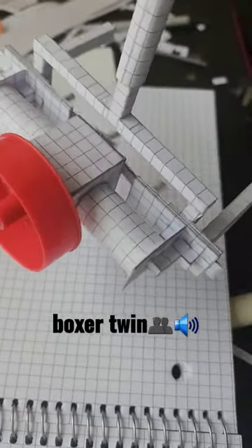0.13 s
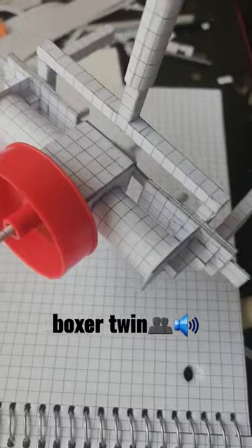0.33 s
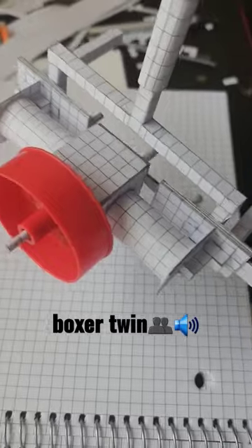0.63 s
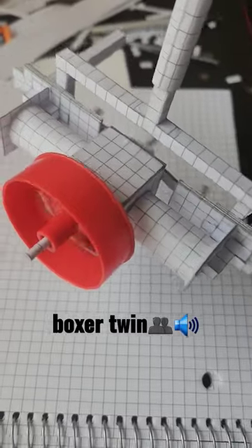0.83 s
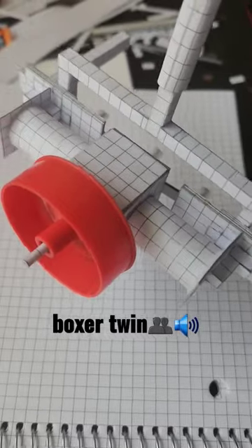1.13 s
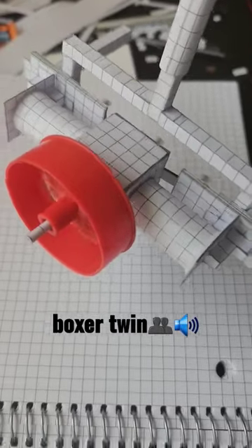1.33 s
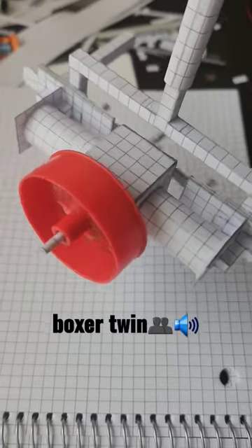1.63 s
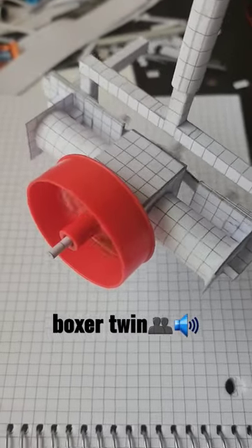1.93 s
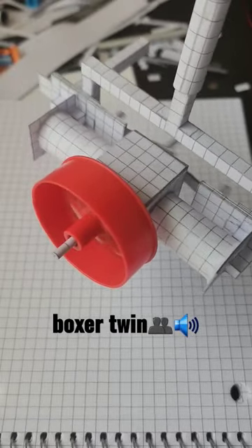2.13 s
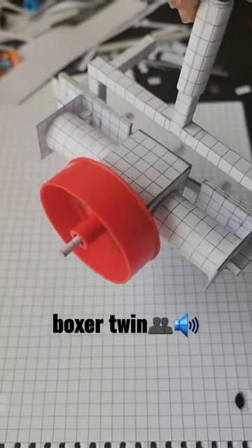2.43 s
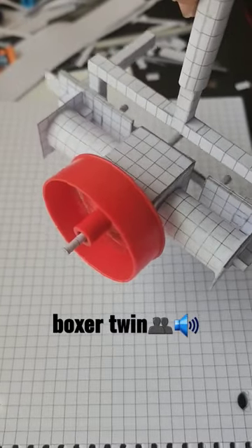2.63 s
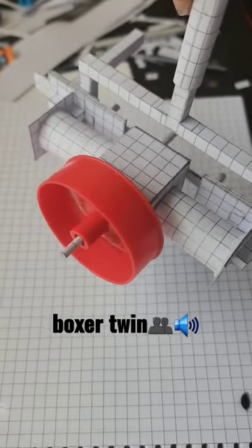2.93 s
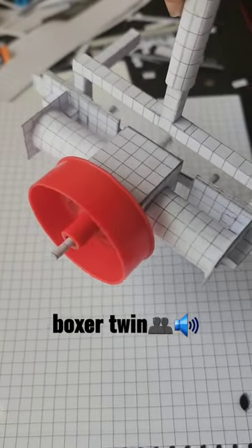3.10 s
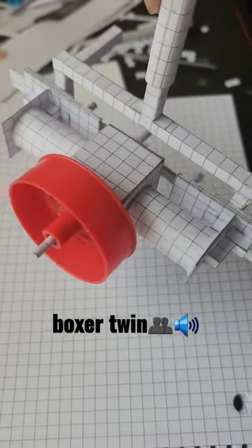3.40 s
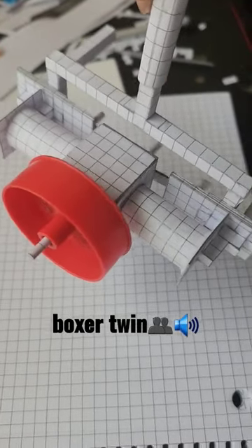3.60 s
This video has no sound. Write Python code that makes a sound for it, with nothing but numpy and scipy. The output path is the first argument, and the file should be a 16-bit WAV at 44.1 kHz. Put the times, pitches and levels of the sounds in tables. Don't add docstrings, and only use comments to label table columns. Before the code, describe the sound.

A small paper air engine putters quickly, low puffs and hollow knocks with dry papery clacks over pulsing air hiss; it slows slightly, surges faster and louder just after one second, then eases. Close stereo microphone, quiet room.

```python
import sys
import numpy as np
from scipy import signal
from scipy.io import wavfile
from scipy.ndimage import uniform_filter1d

SR = 44100
rng = np.random.default_rng(int(sys.argv[2]) if len(sys.argv) > 2 else 0)


def transcribe(u):
    v = np.clip(np.atleast_2d(u).T, -1, 1)
    q = np.round(v * 32767).astype(np.int16)
    wavfile.write(sys.argv[1], SR, q)


def natural_amplitude(level_db):
    exponent = np.asarray(level_db, float) / 20
    return 10 ** exponent


N = 165816
TIME_S = np.arange(N) / SR
PORT_LAG_S, CLICK_LIKENESS = 0.00019, 0.55


def read(points, hz):
    f, value = np.transpose(points)
    return np.interp(np.log(hz + 1), np.log(f + 1), value)


# time_s, pressure_db
AIR_SUPPLY = [(0, -8), (.08, -6.5), (.2, -9.5), (.45, -11), (.9, -14.5), (1.08, -14.5), (1.2, -5),
              (1.35, -2), (1.5, -0.5), (1.8, -3), (2.1, -7), (2.7, -9.5), (3.2, -10.1), (3.76, -9.5)]


def air_db(t_s):
    return np.interp(t_s, *np.transpose(AIR_SUPPLY))


# time_s, strokes_per_s
ENGINE_SPEED = [(0.0, 20.98), (0.091, 25.75), (0.184, 28.13), (0.322, 28.33), (0.57, 25.84), (0.93, 22.61),
                (1.107, 21.45), (1.151, 22.71), (1.222, 24.55), (1.286, 30.27), (1.472, 30.5),
                (1.777, 32.12), (2.039, 32.29), (2.339, 29.29), (2.663, 27.72), (3.238, 25.33),
                (3.76, 24.54)]
FIRST_STROKE = -0.423


def strokes():
    rate = np.interp(TIME_S, *np.transpose(ENGINE_SPEED))
    turns = FIRST_STROKE + np.cumsum(rate) / SR
    return turns, np.interp(np.arange(int(turns[-1]) + 1), turns, TIME_S)


def train(times_s, sizes):
    at = np.round(times_s * SR).astype(int)
    ok = (at >= 0) & (at < N)
    return np.bincount(at[ok], sizes[ok], N)


def ring(hz, decay_ms, order=0):
    u = np.arange(3000) / SR
    v = u * 1000 / decay_ms
    return v ** order * np.exp(-v) * np.sin(2 * np.pi * hz * u)


def t60_ring(hz, t60_s):
    return ring(hz, t60_s * 1000 / np.log(1000))


def walls(x):
    t60_s, size = 0.067, 12000
    taps = rng.choice([-1., 1.], (2, size)) * (rng.random((2, size)) < 0.05)
    taps *= natural_amplitude(-60 * np.arange(size) / SR / t60_s) * (np.arange(size) > 150)
    return signal.oaconvolve(x, taps / np.linalg.norm(taps[0]), axes=1)[:, :N]


# freq_hz, likeness_0_1
PORT_LIKENESS = [(60, .98), (300, .92), (700, .65), (1500, .6), (3000, .3), (15000, .25)]
# freq_hz, balance_db
PORT_BALANCE = [(60, 2), (130, 5.5), (290, 4.5), (640, 2.5), (1410, 6), (3100, 3.5), (6820, 4.5),
                (15000, 3.5)]


def noise(spectrum, patch_db):
    size = 2048 if spectrum[0][0] < 100 else 256
    hz = np.fft.rfftfreq(size, 1 / SR)
    frames = N // (size // 4) + 5
    a, b, c, d, patch = rng.standard_normal((frames, len(hz), 5)).T
    patch = uniform_filter1d(uniform_filter1d(patch, size=4, axis=0), size=5, axis=1)
    same = np.clip(read(PORT_LIKENESS, hz), 0, 1)[:, None]
    tilt = natural_amplitude(read(PORT_BALANCE, hz) / 2)[:, None]
    late = np.exp(-2j * np.pi * hz * PORT_LAG_S)[:, None]
    shared, own = a + 1j * b, c + 1j * d
    second = same * late * shared + np.sqrt(1 - same ** 2) * own
    z = np.array([shared * tilt, second / tilt])
    inside = (hz >= spectrum[0][0]) & (hz <= spectrum[-1][0])
    z *= (natural_amplitude(read(spectrum, hz)) * inside)[:, None] * natural_amplitude(patch_db * patch / patch.std())
    out = signal.istft(z, nperseg=size, noverlap=size * 3 // 4)[1][:, :N]
    return out / out.std()


# freq_hz, density_db
ROOM_AIR = [(40, -10), (70, -10), (120, 1), (200, -3), (310, -9), (440, -14), (800, -9), (1500, -21)]
# freq_hz, density_db
BOX_AIR = [(90, -35), (240, -32), (300, -3.5), (345, 1.5), (400, 2), (450, -37)]


def room_air():
    turns, air = strokes()[0], air_db(TIME_S)
    room = noise(ROOM_AIR, 1.6) * natural_amplitude(-44 + 0.27 * air)
    swell_db = 6.9 * np.sin(np.pi * (turns - 0.1))
    return room + noise(BOX_AIR, 2.3) * natural_amplitude(-42 + 1.1 * air + swell_db)


# choke_db, choke_lead_ms, choke_width_ms, burst_db, burst_decay_ms, swell_db
VALVE_GATE = [
    (-7.5, 1.05, 5, 2.5, 4.5, 7.5),
    (-2, 1, 7.5, 4, 4.5, 9.5),
]


def valve_gate_db():
    turns, times = strokes()
    k = np.clip(np.floor(turns).astype(int), -1, len(times) - 1)
    edges = np.r_[times, times[-1] + 0.04, times[0] - 0.048]
    since_ms, until_ms = (TIME_S - edges[k]) * 1000, (edges[k + 1] - TIME_S) * 1000
    _, _, _, burst_db, burst_decay_ms, swell_db = np.array(VALVE_GATE)[k % 2].T
    choke_db, lead_ms, width_ms = np.array(VALVE_GATE)[(k + 1) % 2].T[:3]
    gate = burst_db * np.exp(-since_ms / burst_decay_ms)
    gate += choke_db * np.exp(-((until_ms - lead_ms) / width_ms) ** 2)
    gate += swell_db * (turns % 1) ** 2
    flutter = uniform_filter1d(uniform_filter1d(rng.standard_normal(N), size=300), size=300)
    return gate + 1.04 * flutter / flutter.std()


# freq_hz, density_db
SLIDING_PAPER = [(260, -53), (450, -23), (515, 11.5), (726, 12.5), (1100, 3.5), (1440, 18.5), (6730, 7.5),
                 (12200, -58.5), (16000, -19)]


def paper_slide(gate_db):
    cycle_db = 0.5 * np.sin(2 * np.pi * (strokes()[0] - 0.05))
    return noise(SLIDING_PAPER, 4.5) * natural_amplitude(-41 + 0.13 * air_db(TIME_S) + cycle_db + 1.5 * gate_db)


# freq_hz, density_db
TUBE_LEAK = [(260, -22), (450, -11.5), (1170, -9), (1400, -9.5), (1830, -13.5), (2550, -5), (5300, -2.5),
             (12200, -6), (16000, -13)]


def air_leak(gate_db):
    level_db = -24.5 + 1.1 * air_db(TIME_S) + uniform_filter1d(gate_db, size=40)
    return noise(TUBE_LEAK, 2.5) * natural_amplitude(level_db)


# freq_hz, level_db, t60_s
PAPER_MODES = [(1424, -8.5, 0.0078), (2690, -5, 0.014), (4230, -4, 0.0042), (5400, -4.2, 0.0056),
               (6650, -0.5, 0.0037), (7410, 2, 0.0044), (9450, -10.5, 0.0031), (11800, -8, .003)]


def paper_blows(times_s, level_db):
    cap_db, colour_db, blow_s = -18, 2.5, 0.0017
    level_db = np.minimum(level_db, cap_db)
    colour = colour_db * rng.standard_normal((len(times_s), len(PAPER_MODES)))
    scratch = rng.standard_normal((2, N))
    scratch[1] = CLICK_LIKENESS * scratch[0] + np.sqrt(1 - CLICK_LIKENESS ** 2) * scratch[1]
    u = np.arange(300)
    blow = 0.26 * np.exp(-u / SR / blow_s) * np.minimum(u / 15, 1)
    out = np.zeros((2, N))
    for k, (hz, mode_db, t60_s) in enumerate(PAPER_MODES):
        hits = train(times_s, natural_amplitude(level_db + mode_db + colour[:, k]))
        drive = signal.oaconvolve(hits, blow)[:N] * scratch
        out += signal.oaconvolve(drive, t60_ring(hz, t60_s)[None], axes=1)[:, :N]
    return out


# start_s, level_db, pitch_hz
PAPER_SNAPS = [(0.0675, -8, 5450), (0.7522, -11.5, 5300), (1.177, -17, 5400), (1.192, -18, 5540),
               (1.256, -8.5, 5550), (1.3279, -8, 5850), (1.349, -12, 5340), (1.3962, -19, 5300),
               (1.7814, -7, 6470), (1.788, -5, 5400), (1.8412, -8.5, 5300), (1.9036, -15, 5300),
               (1.9114, -27, 5230), (2.701, -27, 5470), (3.3486, -14, 4470)]


def snaps():
    out = np.zeros((2, N))
    for start_s, level_db, hz in PAPER_SNAPS:
        snap = natural_amplitude(level_db - 5.5) * (t60_ring(hz, 0.011) + 1.2 * ring(hz * 0.44, 1.0))
        at = round(start_s * SR)
        out[:, at:at + len(snap)] += snap * [[1], [CLICK_LIKENESS]]
    return out


# cylinder, place_strokes, scatter_strokes, chance_0_1, level_db
LOOSE_PARTS = [
    (0, .16, 0.08, .6, -22),
    (0, .6, 0.2, .5, -25),
    (1, .22, .05, .7, -31),
    (1, .45, .05, .4, -19.5),
    (1, 0.5, 0.11, .5, -39),
]


def rattles():
    times = strokes()[1]
    gap_s, at, db = np.gradient(times), [], []
    for side, place, scatter, chance, level_db in LOOSE_PARTS:
        own = slice(int(side) % 2, None, 2)
        t = times[own]
        luck, dice = rng.standard_normal((len(t), 2)), rng.random(len(t))
        at.append(t + gap_s[own] * (place + scatter * luck[:, 0]))
        missed_db = -80 * (dice > chance)
        db.append(level_db + 0.57 * air_db(t) + 3 * luck[:, 1] + missed_db)
    return paper_blows(np.concatenate(at), np.concatenate(db))


# delay_ms, level_db, spread_db
VALVE_CLACKS = [
    (-.6, -20.5, 1),
    (1.2, -22, 1.5),
]


def clacks():
    times, at, db = strokes()[1], [], []
    for side, (delay_ms, level_db, spread_db) in enumerate(VALVE_CLACKS):
        t = times[side::2]
        luck = rng.standard_normal((len(t), 2))
        at.append(t + (delay_ms + 0.4 * luck[:, 0]) / 1000)
        db.append(level_db + 0.18 * air_db(t) + spread_db * luck[:, 1])
    return paper_blows(np.concatenate(at), np.concatenate(db))


def clatter():
    out = snaps() + rattles() + clacks()
    out[1] = np.roll(out[1], round(PORT_LAG_S * SR)) * natural_amplitude(-3.5)
    return signal.sosfilt(signal.butter(2, 900, "high", fs=SR, output="sos"), out)


# lead_ms, freq_hz, decay_ms, level_db, air_share
PUFF_MODES = [
    [(4.42, 117, 5.16, -19.5, .5), (4.57, 96, 5.7, -23.5, .5)],
    [(4.5, 57, 11, -29, 0.2), (4.5, 66, 14, -27.5, 0.6)],
]


def puffs(port, times, luck):
    out = np.zeros(N)
    for mode in PUFF_MODES:
        lead_ms, hz, decay_ms, level_db, air_share = mode[port]
        size = -natural_amplitude(level_db + air_share * air_db(times) + 0.5 * luck[:, 0])
        out += signal.oaconvolve(train(times - lead_ms / 1000, size), ring(hz, decay_ms))[:N]
    return out


# lead_ms, freq_hz, decay_ms, level_db
CYLINDER_KNOCK = [
    [(4.1, 260, 1.6, 0), (3.3, 308, 1.7, -6)],
    [(3.9, 275, 2.2, 0), (3.2, 310, 2.3, -6)],
]
# time_s, cylinder_0_db, cylinder_1_db
PISTON_LANDING = [(0, -14.5, -15), (.15, -10, -11.5), (.35, -15.5, -15), (.7, -17.5, -17),
                  (1.05, -23.5, -19), (1.2, -12, -13.5), (1.3, -5.5, -12.5), (1.45, -7, -18.5),
                  (1.7, -5, -14.5), (2.0, -10, -14), (2.4, -12.5, -14.5), (3.76, -12.5, -13.5)]


def knocks(port, times, luck):
    spread_db, wobble_ms = 1.6, 0.15
    rebound_ms, rebound_db = (9.5, 8.1), (-18, -10)
    landing, out = np.transpose(PISTON_LANDING), np.zeros(N)
    for side in range(2):
        lead_ms, hz, decay_ms, level_db = CYLINDER_KNOCK[side][port]
        own = luck[side::2]
        t = times[side::2] + (wobble_ms * own[:, 1] - lead_ms) / 1000
        force_db = np.interp(t, landing[0], landing[1 + side])
        size = natural_amplitude(level_db + force_db + spread_db * own[:, 2])
        hits = train(t, size)
        hits += train(t + rebound_ms[side] / 1000, size * natural_amplitude(rebound_db[side]))
        out += signal.oaconvolve(hits, ring(hz, decay_ms, order=1))[:N]
    return out


def thumps():
    times = strokes()[1]
    luck = rng.standard_normal((len(times), 3))
    out = np.array([puffs(port, times, luck) + knocks(port, times, luck) for port in range(2)])
    return signal.sosfiltfilt(signal.butter(3, 440, fs=SR, output="sos"), out)


def scene():
    gate_db = valve_gate_db()
    air = room_air() + paper_slide(gate_db) + air_leak(gate_db)
    clicks, low = clatter(), thumps()
    tail = walls(natural_amplitude(-15) * low + natural_amplitude(-9) * clicks)
    return air + tail + clicks + low


def band_limit(x):
    return signal.sosfilt(signal.butter(12, 15700, fs=SR, output="sos"), x)


def record(dry):
    cut = signal.sosfiltfilt(signal.butter(2, 44, "high", fs=SR, output="sos"), dry)
    lowpass = signal.firwin(511, 15600, window=("kaiser", 9), fs=SR)
    mix = signal.oaconvolve(cut, lowpass[None], "same")
    return band_limit(mix)


dry = scene()
out = record(dry)
transcribe(out)
```